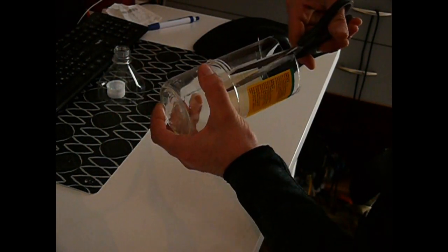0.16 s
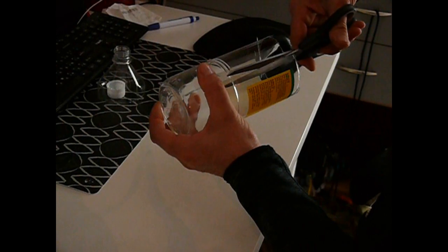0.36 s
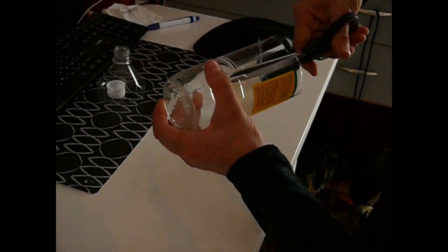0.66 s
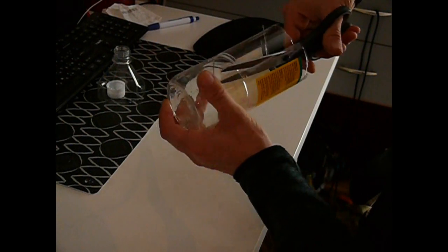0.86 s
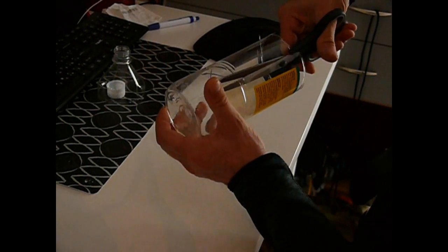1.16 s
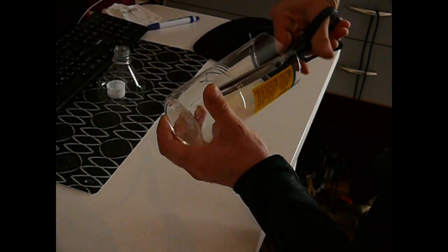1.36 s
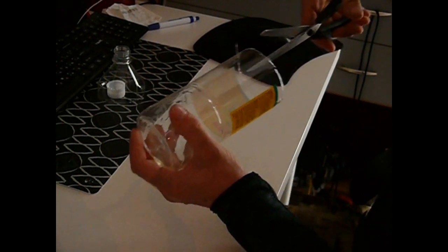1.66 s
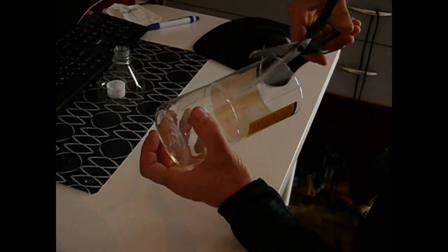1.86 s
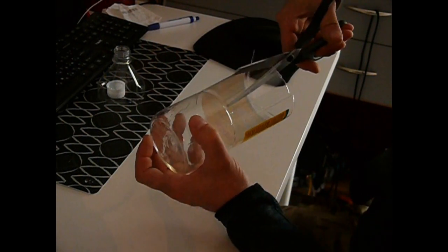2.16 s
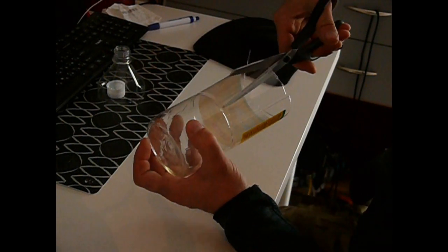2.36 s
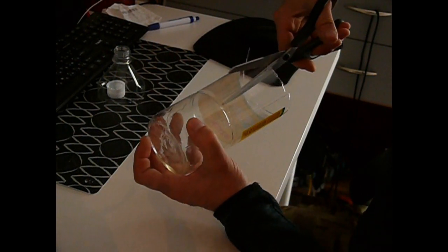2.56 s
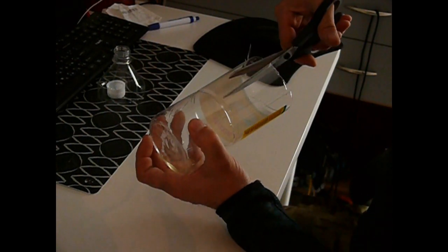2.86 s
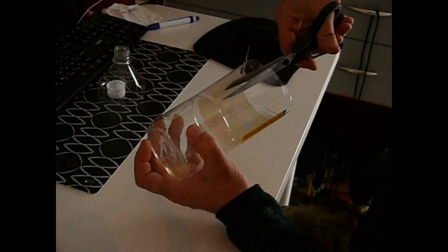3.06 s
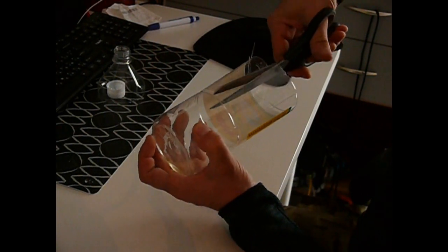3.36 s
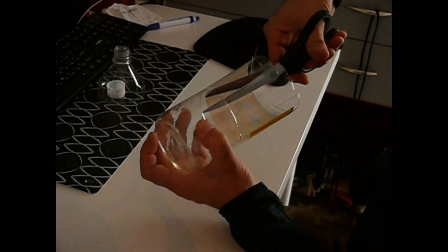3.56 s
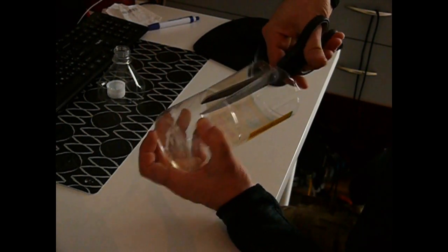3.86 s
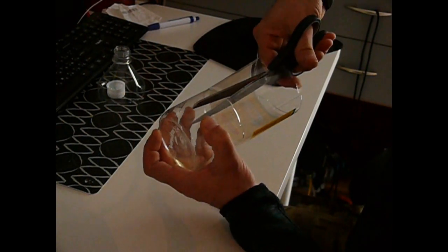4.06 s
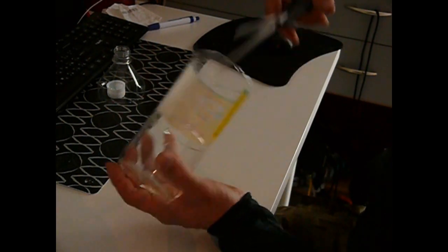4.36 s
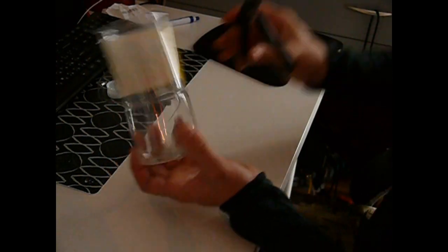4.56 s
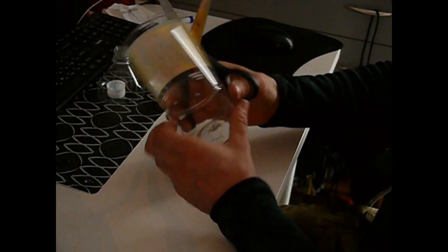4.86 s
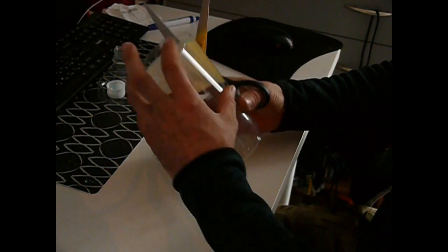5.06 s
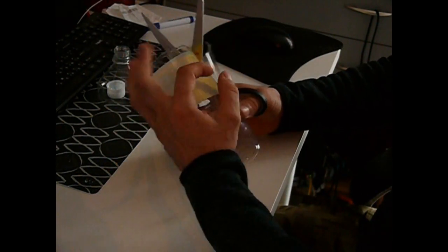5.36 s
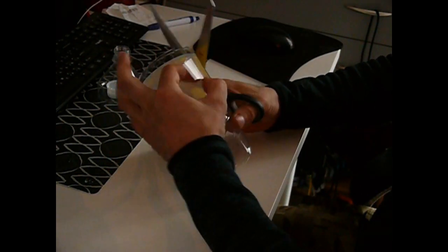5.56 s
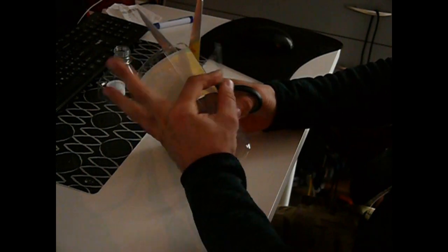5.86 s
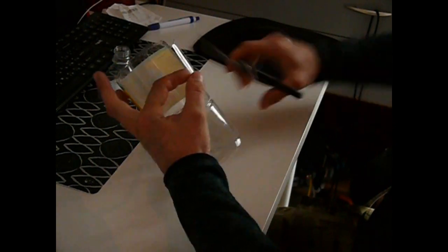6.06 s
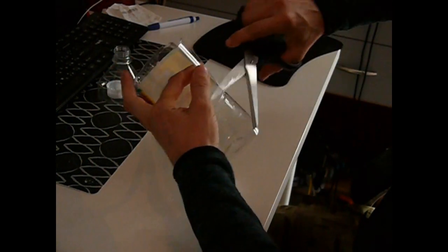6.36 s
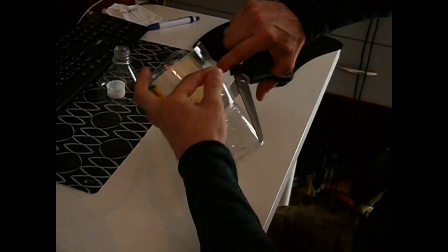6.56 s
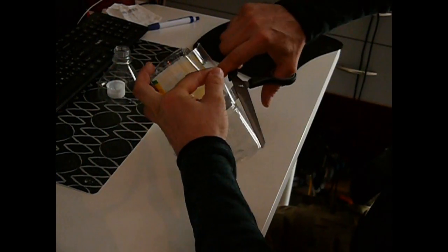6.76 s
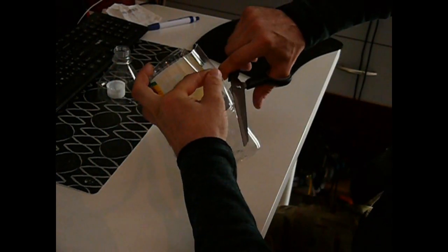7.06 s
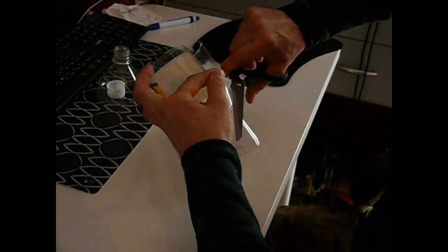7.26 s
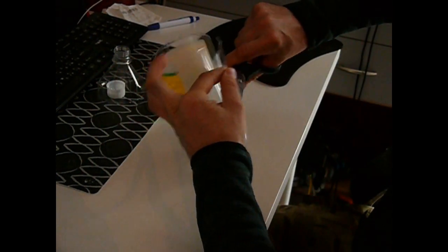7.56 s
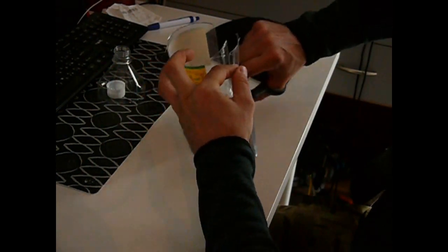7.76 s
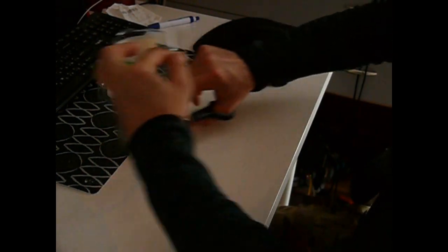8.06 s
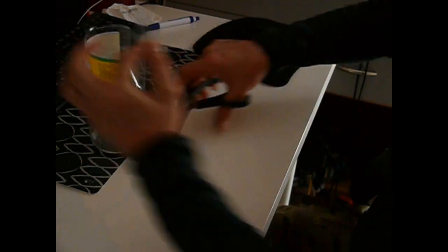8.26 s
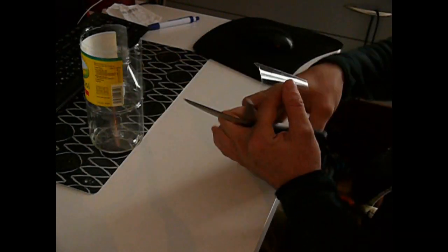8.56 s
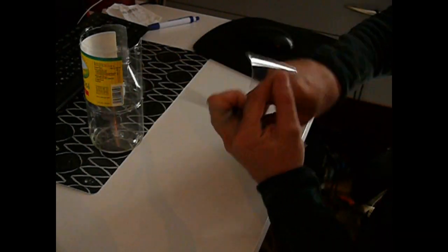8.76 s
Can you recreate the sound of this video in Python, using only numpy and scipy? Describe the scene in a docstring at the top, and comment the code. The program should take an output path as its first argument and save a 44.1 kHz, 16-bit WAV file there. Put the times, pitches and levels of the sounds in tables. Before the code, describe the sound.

Close in a small room, over very faint thin hiss, fingers rub plastic and scissors begin cutting a thin bottle. From 0 to 1.3 seconds dry snaps and short crackling strokes come densely, with a slight steely ring; a loud buckling crack hits near 1.4. From 1.6 to 2.9 it is almost quiet, only small ticks. Cutting resumes around 3.2, building to hard bright cracks at 3.6 to 3.75, then crisp crackles at 4.0 and 4.4. Between 4.5 and 5.1 there is light handling; a hollower pop comes at 5.2 and a sharp crack at 5.9. From 6.4 snips and crinkles sound boomier, with clusters at 6.5 and 7.45 and a strong hollow buckle at 7.65. Last crinkles at 8.0 to 8.2 fade to faint ticks and quiet. The coarse microphone dulls the top, fizzes on faint detail and thumps low on the hardest cracks.

```python
"""A faint rub of plastic over thin hiss comes first, then dry snaps: scissors cut a strip from a thin plastic bottle.
Each stroke of the large blades is a run of tiny fractures; in between, the wall buckles and snaps under the fingers.
All of it rings the wall, its dense high modes and the air inside, which booms more once the bottle is slit open.
The hands work over a desk in a small room; the hardest cracks overload the microphone with bursts of low noise."""
import sys
import numpy as np
from scipy import signal
from scipy.fft import rfft, irfft
from scipy.io import wavfile

SR = 44100
rng = np.random.default_rng(int(sys.argv[2]) if len(sys.argv) > 2 else 0)


def output_pcm(signal):
    """Save a mono or channel-first signal as 16-bit PCM at the path in sys.argv[1].

    Samples are clipped to [-1, 1] before scaling.
    """
    pcm = np.clip(np.atleast_2d(signal).T, -1, 1) * 32767
    wavfile.write(sys.argv[1], SR, np.round(pcm).astype(np.int16))


N = 392931


def undb(db):
    """Decibels to gain."""
    return 10 ** (np.asarray(db) / 20)


def clock(seconds):
    """Sample times of a short stretch."""
    return np.arange(max(int(seconds * SR), 8)) / SR


def unit(x, size=None):
    """Scale to rms 1 over the first size samples."""
    return x / np.sqrt(np.mean(x[:size] ** 2) + 1e-18)


def fade(t, t60):
    """Exponential decay by 60 dB in t60 seconds."""
    return np.exp(-np.log(1000) * t / t60)


def add(out, start_s, x):
    """Mix x into out at start_s."""
    i = int(np.clip(start_s * SR, 0, N - 1))
    out[i:i + len(x)] += x[:N - i]


def low_pass(order, corner_hz):
    """Filter sections that pass the lows."""
    return signal.butter(order, corner_hz, fs=SR, output="sos")


def colour(points, tilt_db=0, ripple_db=0, spacing_hz=300, size=2048):
    """Causal response with a given spectrum, tilted around 4300 Hz, with chance resonances on top."""
    hz, db = np.transpose(points)
    bins = np.maximum(np.fft.rfftfreq(size, 1 / SR), 1)
    tilt = tilt_db * np.clip(np.log2(bins / 4300), -1, 1)
    ripple = ripple_db * np.interp(bins / spacing_hz, np.arange(size), rng.standard_normal(size))
    spectrum_db = np.interp(np.log(bins), np.log(hz), db) + tilt + ripple
    # folding the cepstrum puts the energy as early as possible (minimum phase)
    cepstrum = irfft(np.log(undb(spectrum_db)))
    cepstrum[1:size // 2] *= 2
    cepstrum[size // 2 + 1:] = 0
    return irfft(np.exp(rfft(cepstrum)))


def through(x, response):
    """Pass x through a response, keeping its length."""
    return signal.fftconvolve(x, response)[:len(x)]


# spectral shape of the room and microphone noise: frequency_hz, relative_level_db
HISS_COLOUR = [(25, 8), (110, 1.5), (270, 10), (900, 11), (1200, 4.5), (1450, 10.5), (1750, 3), (4000, 2.5),
               (7200, -0.5), (8000, -8)]
# the faint noise, with a brief dip: time_s, level_db
HISS_LEVEL = [(0, -56.5), (2.5, -56.5), (4.55, -59), (4.68, -59), (4.785, -66), (4.85, -59), (5.101, -56.5),
              (8.65, -55.5)]


def hiss():
    """Smooth background noise: random samples shaped by a fixed spectrum and a slow level curve."""
    level_db = np.interp(np.arange(N) / SR, *np.transpose(HISS_LEVEL))
    noise = through(rng.standard_normal(N), colour(HISS_COLOUR))
    return undb(level_db) * unit(noise)


def reflections(low_t60=.38, high_t60=.26, low_db=-10, high_db=-9, split_hz=1800, build_s=0.0072):
    """Response of a small room: it builds up within milliseconds, and the treble dies first."""
    t = clock(.6)
    noise = rng.standard_normal(len(t))
    low = signal.sosfilt(low_pass(1, split_hz), noise)
    tail = 0
    for band, t60, db in ((low, low_t60, low_db), (noise - low, high_t60, high_db)):
        shape = fade(t, t60) * (1 - np.exp(-(t / build_s) ** 2))
        tail = tail + undb(db) * band * shape / np.linalg.norm(shape)
    return tail


def room(x, count=6):
    """The reflections crossfade from place to place as the hands move the bottle about."""
    place = np.linspace(0, count - 1, N)
    wet = 0
    for k in range(count):
        share = np.sqrt(np.maximum(1 - np.abs(place - k), 0))
        wet = wet + through(x * share, reflections())
    return x + wet


def ring(modes, pitch_hz=None, spread_oct=0.46, *, scatter_db, detune):
    """Damped modes with chance levels and detuning; those near pitch_hz, if given, are favoured."""
    hz, width_hz, db = np.transpose(modes)
    chance = rng.standard_normal((len(hz), 3)).T
    gain = undb(db + scatter_db * chance[0]) * np.sign(chance[1])
    if pitch_hz is not None:
        gain = gain / (1 + (np.log2(hz / pitch_hz) / spread_oct) ** 2) ** 2
    t = clock(.13)[:, None]
    decay = np.exp(-np.pi * width_hz * t)
    tones = np.sin(2 * np.pi * hz * (1 + detune * chance[2]) * t)
    return (decay * tones) @ gain


def radiate(force, response, corner_hz):
    """A small thin body radiates little below its lowest modes."""
    high_pass = signal.butter(2, corner_hz, "highpass", fs=SR, output="sos")
    return signal.sosfilt(high_pass, through(force, response))


# bending modes of the wall, before chance and grip: frequency_hz, width_hz, relative_level_db
WALL_MODES = [(610, 72, 8.5), (745, 36, -2), (807, 34, 0), (889.4, 38, 2.5), (982, 81, -3), (1063, 62, -5),
              (1135, 57, -1.5), (1239, 52, 0), (1347, 55, -3), (1415, 45, 0.5), (1605, 75, 0),
              (1832, 70, -4), (2140, 140, -6)]


def wall_ring(force, pitch_hz=None):
    """The bending modes of the wall; grip and point of contact favour those near one pitch."""
    return radiate(force, ring(WALL_MODES, pitch_hz, scatter_db=2, detune=0.012), corner_hz=408.6)


# modes of the hollow body, before chance: frequency_hz, width_hz, relative_level_db
HOLLOW_MODES = [(234.5, 30, -11.5), (299.8, 21.3, 0), (345, 35, -7.5), (374.8, 50, 1), (457, 11, -11.5)]


def hollow_ring(force):
    """The hollow body booms in modes steadier than those of the wall."""
    return radiate(force, ring(HOLLOW_MODES, scatter_db=1.5, detune=0.0013), corner_hz=213.3)


# colour of the dense high modes, before tilt and ripple: frequency_hz, relative_level_db
CRACKLE_COLOUR = [(150, -26), (450, -10.5), (1300, 2.5), (1850, -0.5), (2300, 2), (2550, -0.5), (2850, 3.5),
                  (3300, 3.5), (3900, 2), (4900, 0), (5900, 1), (7100, 3.5), (7700, -4), (8600, -29),
                  (9300, -38.5)]


def crackle(force, tilt_db, sheet_t60=0.028, sheet_db=-17, count=5):
    """Each crack arrives directly, then scatters through the high modes of one of a few spots of the sheet."""
    t = clock(0.051)
    spot = rng.integers(0, count, len(force))
    out = 0
    for k in range(count):
        sheet = undb(sheet_db) * rng.standard_normal(len(t)) * fade(t, sheet_t60)
        sheet[0] = 1  # direct arrival
        tone = colour(CRACKLE_COLOUR, tilt_db, ripple_db=4)
        out = out + through(force * (spot == k), through(sheet, tone))
    return out


def bottle(force, size, hollow_db, crackle_db, tilt_db, pitch_hz):
    """A force rings wall, hollow body and high modes, balanced by their rms over the first size samples."""
    force = np.pad(force, (0, SR // 10))  # room for the ring to die
    wall = unit(wall_ring(force, pitch_hz), size)
    hollow = undb(hollow_db) * unit(hollow_ring(force), size)
    return wall + hollow + undb(crackle_db) * unit(crackle(force, tilt_db), size)


# a harder push is more local: it favours the wall over the hollow body
USUAL_DB, HOLLOW_DB_PER_DB = -38.5, -0.59
# grip and opening slit tune the bottle: time_s, hollow_re_wall_db (at the usual push), favoured_wall_pitch_hz
GRIP = [(0, -24.5, 966), (1.27, -26.5, 954), (1.499, -25, 1196), (2.2, -20.5, 1080), (3.6, -24, 1043),
        (4.9, -22.5, 1168), (5.4, -10, 1145), (5.75, -19.5, 1280), (6.52, -27.5, 1250), (6.62, -3.5, 1266),
        (7.2, -5, 1156), (7.75, -1.5, 1290), (8.199, -10.5, 1365), (8.9, -7.5, 1210)]


def grip(time_s, push_db=USUAL_DB):
    """Hollow level and wall pitch drift with the grip; a harder push weakens the hollow share."""
    times, *columns = np.transpose(GRIP)
    hollow_db, pitch_hz = (np.interp(time_s, times, column) for column in columns)
    return hollow_db + HOLLOW_DB_PER_DB * (push_db - USUAL_DB), pitch_hz


def fractures(size, rate, scatter_db):
    """Tiny cracks at random moments (rate per second), of uneven strength."""
    chance = rng.random((size, 2)).T
    strength_db = scatter_db * np.minimum(-np.log(1 - chance[0]), 4)
    strength = undb(strength_db) * rng.choice([-1, 1], size)
    return unit(strength * (chance[1] < rate / SR))


def unevenness(t, rate_hz, spread_db):
    """A gain that wanders at random as the contact sticks and slips."""
    steps = rng.standard_normal(len(t) // 40)
    return undb(spread_db * np.interp(t * rate_hz, np.arange(len(steps)), steps))


REST_DB = -61  # creep of the fingers while they only hold the bottle, before the rubbing trims
# fingers or blades slide over the plastic; the row at 3.764 is the ring left by the hard crack before it:
# start_s, length_s, wall_db (before the rubbing trims), crackle_re_wall_db (before the rubbing trims)
RUBS = [(-0.12, 0.24, -42, 1.5), (0.341, 0.43, -48.5, 5), (0.79, 0.13, -41, 4), (0.933, 0.3, -49.5, -5.5),
        (1.284, 0.16, -41, -3.5), (1.505, 0.12, -48.5, 10), (2.837, .3, -49, -3.5),
        (3.198, 0.15, -45.5, -5.5), (3.42, 0.2, -53, 6.5), (3.764, .14, -44, -15), (4.33, 0.26, -45, -2.5),
        (5.051, 0.49, -49.5, 1), (5.472, 0.36, -46, 1.5), (5.866, 0.2, -51.5, -2), (6.371, .18, -50.5, 6.5),
        (6.558, 0.21, -44.5, 1), (6.765, 0.23, -54, -4.5), (7.05, 0.29, -58.5, 0.5),
        (7.352, 0.14, -50.5, 2), (7.576, 0.12, -47.5, -6), (7.876, 0.25, -48.5, 0.5),
        (8.18, 0.28, -56.5, 1.5)]


def sliding(times, rest_crackle_db=-3):
    """Gains of wall and crackle: every row swells and fades in one arch above the resting creep."""
    start_s, length_s, wall_db, crackle_db = np.transpose(RUBS)
    arches = np.sin(np.pi * np.clip((times[:, None] - start_s) / length_s, 0, 1))
    wall = np.hypot(arches @ undb(wall_db), undb(REST_DB))
    high = np.hypot(arches @ undb(wall_db + crackle_db), undb(REST_DB + rest_crackle_db))
    return wall, high


def rubbing(wall_db=-3.5, crackle_db=-4.5, boom_db=4):
    """Overlapping patches of faint, fine grains: creep and slides over the plastic, and one ring after a crack."""
    out, t = np.zeros(N), clock(.2)
    half_s = t[-1] / 2
    for middle_s in np.arange(0, N / SR, half_s):
        start_s = max(middle_s - half_s, 0)
        wall_gain, crackle_gain = sliding(start_s + t)
        hollow_db, pitch_hz = grip(middle_s)
        force = fractures(len(t), rate=1100, scatter_db=4.0) * unevenness(t, rate_hz=70, spread_db=3.5)
        body = unit(wall_ring(force, pitch_hz)) + undb(hollow_db + boom_db) * unit(hollow_ring(force))
        high = unit(crackle(force, 0))
        patch = wall_gain * undb(wall_db) * body + crackle_gain * undb(crackle_db) * high
        add(out, start_s, patch * np.sin(np.pi * t / t[-1]))
    return out


# the whole bottle buckles and jerks: start_s, cascade_t60_s, wall_db (before the buckle trim), hollow_re_wall_db,
# crackle_re_wall_db, favoured_wall_pitch_hz, overload_db
BUCKLES = [(1.366, 0.043, -18.5, -19, -5, 1056, -39.5), (3.627, .033, -25.5, -16.5, -2, 1010, -41),
           (3.7345, 0.15, -24, -23, 6.5, 1125, -37), (3.976, 0.13, -39, -10, 9.5, 1145, -35),
           (4.0015, 0.1, -41, -30, 20, 1360, -38), (4.365, 0.027, -38, -24, 14.5, 1330, -45.5),
           (5.2156, 0.058, -25.5, -2, -1, 890, -57), (5.829, 0.016, -39, 7, -10, 1040, -62),
           (5.8609, 0.18, -27.5, -21, 8, 1306, -35), (7.6453, 0.17, -23, -7.5, 3, 1210, -41),
           (8.1201, .11, -38, -19, 12.5, 1300, -71)]


def overload_lows(t60=0.047, corner_hz=220):
    """A short burst of low noise as the hardest cracks overload the microphone."""
    out, t = np.zeros(N), clock(.08)
    for start_s, *_, overload_db in BUCKLES:
        burst = signal.sosfilt(low_pass(2, corner_hz), rng.standard_normal(len(t)) * fade(t, t60))
        add(out, start_s, undb(overload_db) * unit(burst, len(clock(.015))))
    return out


def give_way(rise_s, t60, click_db=23, yield_s=0.00076):
    """The wall gives way with a click, stronger the faster it yields, then a dying cascade of smaller ones."""
    t = clock(0.54)
    shape = np.minimum(t / rise_s, 1) * fade(np.maximum(t - rise_s, 0), t60)
    force = fractures(len(t), rate=3000, scatter_db=3) * shape
    force[int(rise_s * SR)] += undb(click_db) / (1 + (rise_s / yield_s) ** 2)
    return force


def buckles(rise_s=0.00032, tilt_db=0.77, gain_db=-0.5):
    """The bottle jumps into a new shape: a hard crack with its own ring."""
    out, size = np.zeros(N), len(clock(.012))
    for start_s, t60, wall_db, hollow_db, crackle_db, pitch_hz, _ in BUCKLES:
        sound = bottle(give_way(rise_s, t60), size, hollow_db, crackle_db, tilt_db, pitch_hz)
        add(out, start_s, undb(wall_db + gain_db) * sound)
    return out


# modes of the steel, damped by the plastic between the blades, before chance:
# frequency_hz, width_hz, relative_level_db
BLADE_MODES = [(2793, 94, 3.5), (2900, 120, -4), (3190, 120, -0.5), (7060, 270, -5), (7020, 54, 2.5)]
# spans in which the blades sit in the plastic and ring with its cracks: start_s, end_s, blade_re_crackle_db
BITES = [(0, 1.6, -4.5), (3.1, 4.5, -12), (6.4, 8.1, -10.5)]


def blades(time_s, force, size):
    """The steel rings with a crack only while it bites the plastic."""
    gain = sum(undb(db) for start_s, end_s, db in BITES if start_s <= time_s < end_s)
    response = ring(BLADE_MODES, scatter_db=2.5, detune=.005)
    steel = radiate(np.pad(force, (0, SR // 10)), response, corner_hz=1800)
    return gain * unit(steel, size)


SNAP_T60_S = 0.042  # cascade after a snap
# small snaps of the wall under blades and fingers: start_s, rise_s, wall_db (before the snap trim),
# crackle_re_wall_db, brightness_db_per_octave
SNAPS = [(0.0479, .001, -38, -11, 5), (0.1632, 0.00034, -28.5, -6.5, -6), (0.1776, 0.00039, -35, -3.5, -6),
         (0.2395, 0.0035, -36, -15, 1.5), (0.352, .0004, -39.5, -8.5, 6), (0.3851, .004, -39, -16, 3),
         (0.4223, 0.00056, -35.5, -3.5, 7.5), (0.498, 0.0048, -37, 0, -8.5), (0.528, .0026, -27, -8, 6),
         (0.5608, .0006, -35, -9, -5), (0.6173, .0006, -43.5, -4, 10.5), (0.7139, 0.00039, -34, -17, -5),
         (0.7489, 0.003, -26.5, -7, 0), (0.7871, 0.0032, -33.5, 2, -3.5), (0.832, .0044, -34, 4.5, -1),
         (0.8852, .0003, -30, -15, 12), (0.8929, 0.0015, -26.5, -4.5, -3.5),
         (0.93, 0.00016, -28, -10, -1.5), (1.072, 0.0024, -31, 1.5, 1), (1.129, .0003, -28.5, -11, -6),
         (1.276, 0.00036, -37, -6, -6), (1.501, 0.0042, -39, 11, 8.5), (1.864, 0.00054, -50.5, -9, -4),
         (1.992, .0002, -45, -4.5, 2), (2.1241, 0.003, -41, 0, 10.5), (2.7307, 0.00038, -44.5, 0.5, 4.5),
         (3.17, .0026, -30, -16, -1), (3.2057, 0.00037, -36, 4.5, 7), (3.342, 0.0043, -30.5, -7.5, 5.5),
         (3.565, 0.00044, -32.5, 0, 1), (3.5903, 0.0003, -24, -4.5, 2), (3.6206, .0004, -21, -7, 1.5),
         (3.9267, 0.00095, -38, -5, 5), (3.9705, 0.0063, -36, 9.5, 6.5), (4.1666, 0.0038, -46, -7, 3),
         (4.2245, 0.00087, -31.5, -5.5, 0), (4.2871, 0.0036, -50.5, 10, 5), (4.335, 0.00096, -38, -1, 2.5),
         (4.4285, .0003, -35.5, 4, 9.5), (4.461, .0003, -35, -5.5, 8), (4.527, 0.00029, -47.5, 6, 2),
         (4.5465, .0003, -43, 4, 3), (4.7993, 0.0035, -39.5, 1, 3), (4.8239, 0.00025, -35, -9.5, 2),
         (4.842, .0003, -47, 5.5, 4.5), (4.96, .0008, -38.5, 2, -4), (5.0863, 0.0039, -50, 6.5, -3.5),
         (5.1241, 0.0011, -47.5, 8.5, 9), (5.2968, .005, -32, -3.5, 12), (5.371, 0.0021, -41.5, -8, -2),
         (5.4778, 0.0018, -41, -2, 0), (5.6766, .0003, -43, 3.5, -3.5), (5.702, 0.0043, -35, -5, 1),
         (5.9146, 0.00036, -32, 3, 1.5), (5.98, 0.00065, -33.5, 2, 1.5), (5.9931, 0.00031, -28.5, 0.5, 2),
         (6.2863, 0.0034, -32, -9.5, 3), (6.4004, 0.0032, -38.5, -1.5, 2), (6.5283, 0.00019, -28, -1, 1.5),
         (6.5949, 0.0014, -41.5, -6, -7), (6.807, 0.00025, -40.5, 2.5, 5), (7.1, .0003, -29.5, -10, -0.5),
         (7.316, 0.00028, -39.5, 6, 3.5), (7.422, 0.00035, -41.5, -3, 0.5), (7.4422, 0.0029, -38, 0.5, 0.5),
         (7.4664, 0.0037, -29, 3, 3.5), (7.4752, 0.00027, -24.5, -10, 3.5), (7.5437, .0004, -44.5, 2, 2),
         (8.196, .004, -36.5, -3, -8.5), (8.2855, 0.00032, -49, -7, 11), (8.418, 0.0018, -49, -14, -1.5),
         (8.5214, 0.0056, -54, -4.5, -2)]


def snaps(gain_db=-1.56):
    """A small patch of the wall snaps and rings the bottle as it is held."""
    out, size = np.zeros(N), len(clock(.012))
    for start_s, rise_s, wall_db, crackle_db, tilt_db in SNAPS:
        hollow_db, pitch_hz = grip(start_s, wall_db)
        force = give_way(rise_s, SNAP_T60_S)
        body = bottle(force, size, hollow_db, crackle_db, tilt_db, pitch_hz)
        steel = undb(crackle_db) * blades(start_s, force, size)
        add(out, start_s, undb(wall_db + gain_db) * body)
        add(out, start_s, undb(wall_db + gain_db) * steel)
    return out


CREST_SHARE = 0.32  # how far into a stroke the blades press hardest
SLIPS_PER_S, SLIP_DB_PER_DB = 1000, 0.5  # base rate; the crisper a stroke, the more finely it is divided
# strokes of cutting and crinkling: start_s, length_s, wall_db (before the stroke trim),
# crackle_re_wall_db, brightness_db_per_octave
STROKES = [(0.162, .072, -34.5, -0.5, 3), (0.228, 0.031, -31.5, -21, -2), (0.522, 0.023, -29.5, -5, 0.5),
           (0.784, 0.037, -34.5, 1.5, 1), (0.826, 0.033, -36.5, 6, 3.5), (0.876, 0.039, -32.5, 3.5, -2),
           (0.918, 0.034, -36, -6, -6), (1.227, .062, -38.5, -14.5, -0.5), (1.468, 0.056, -31, -2.5, 2),
           (1.514, 0.049, -34.5, 1.5, 1.5), (2.12, .047, -46, -5, 0), (2.945, 0.064, -47.5, -0.5, 9.5),
           (3.008, 0.064, -50, 5, 6), (3.164, .086, -34, 1, 3.5), (3.435, 0.083, -40.5, -2, 6),
           (3.59, 0.053, -32, -5, 7.5), (3.964, 0.052, -32, 7, 8), (4.001, 0.067, -42, 15, 5.5),
           (4.35, 0.068, -37, 7, 7), (4.42, 0.056, -39.5, -4.5, 2), (4.8, 0.06, -45.5, -1, 2.5),
           (4.962, 0.046, -39, 1, 0), (5.289, 0.027, -33, -1, 4.5), (5.665, 0.064, -47.5, 2.5, 3.5),
           (6.05, 0.046, -51.5, 12, -0.5), (6.471, 0.054, -34, -4.5, 1.5), (6.523, 0.073, -37.5, -6, 1),
           (6.638, 0.093, -37.5, -4.5, 2.5), (7.138, .13, -51.5, -9.5, -2), (7.445, 0.058, -37.5, -6, 3.5),
           (7.672, 0.06, -35, -8.5, -3.5), (7.76, 0.029, -49.5, -11, 3), (7.953, 0.072, -39.5, -3.5, -2.5),
           (8.007, .14, -49.5, 14, 2.5), (8.13, 0.06, -45.5, 9.5, 3.5), (8.19, 0.055, -35, -3.5, -4)]


def strokes(gain_db=-2.5):
    """The blades shear on in small slips and ring a little; the run of fractures swells to a crest and dies."""
    out = np.zeros(N)
    for start_s, length_s, wall_db, crackle_db, tilt_db in STROKES:
        t = clock(length_s)
        hollow_db, pitch_hz = grip(start_s, wall_db)
        pressure = np.sqrt(np.interp(t / length_s, [0, CREST_SHARE, 1], [.1, 1, 0]))
        slips = SLIPS_PER_S * undb(SLIP_DB_PER_DB * max(crackle_db, 0))
        force = fractures(len(t), rate=slips, scatter_db=2.5) * pressure
        force = force * unevenness(t, rate_hz=214, spread_db=1.5)
        body = bottle(force, len(t), hollow_db, crackle_db, tilt_db, pitch_hz)
        steel = undb(crackle_db) * blades(start_s, force, len(t))
        add(out, start_s, undb(wall_db + gain_db) * body)
        add(out, start_s, undb(wall_db + gain_db) * steel)
    return out


def scene():
    """The bottle in the room, with the overload's low bursts and the hiss added dry."""
    handled = rubbing() + buckles() + snaps() + strokes()
    return (room(handled) + overload_lows() + hiss())[None]


def convert(x, rate_hz=16000, step=.0052):
    """A coarse converter: quiet sound barely flips its last step, so it fizzes, and fainter sound vanishes."""
    sampled = signal.resample(x, N * rate_hz // SR)
    stepped = np.round(np.pad(sampled, (0, 2)) / step) * step
    return signal.resample_poly(stepped, SR, rate_hz)[:N]


def record(dry, ceiling=0.59, offset=-0.012, top_hz=9100):
    """A small recorder rounds the highest peaks, samples coarsely, cuts the top and sits slightly off zero."""
    rounded = ceiling * np.tanh(dry[0] / ceiling)
    sampled = convert(rounded)[None]
    top_cut = signal.ellip(8, .2, 70, top_hz, fs=SR, output="sos")
    return signal.sosfilt(top_cut, sampled) + offset


dry = scene()
out = record(dry)
output_pcm(out)
```